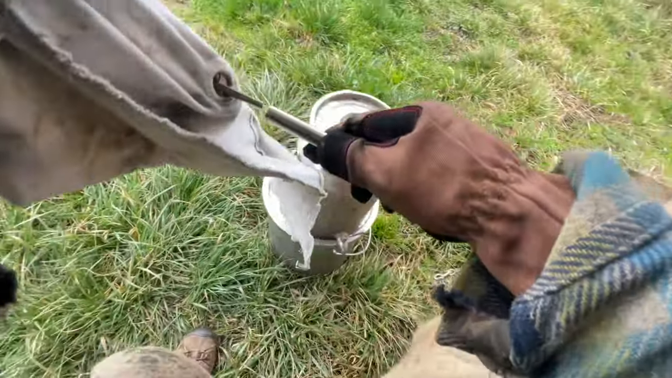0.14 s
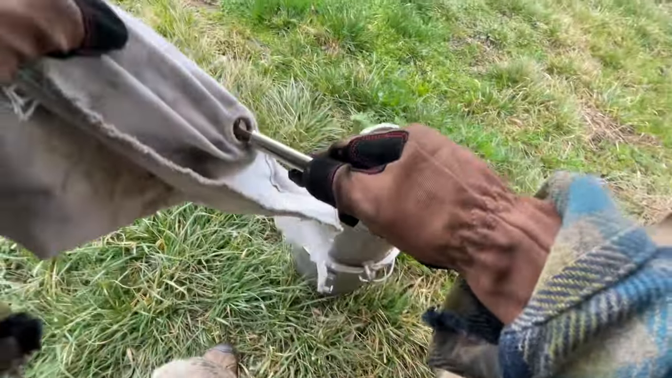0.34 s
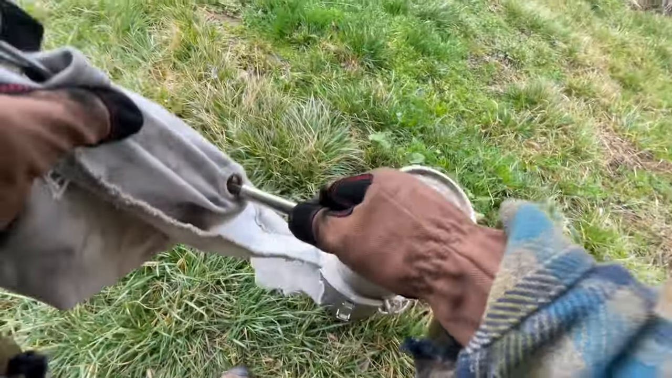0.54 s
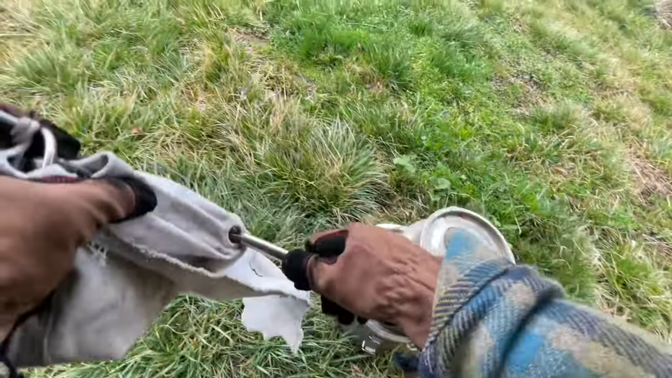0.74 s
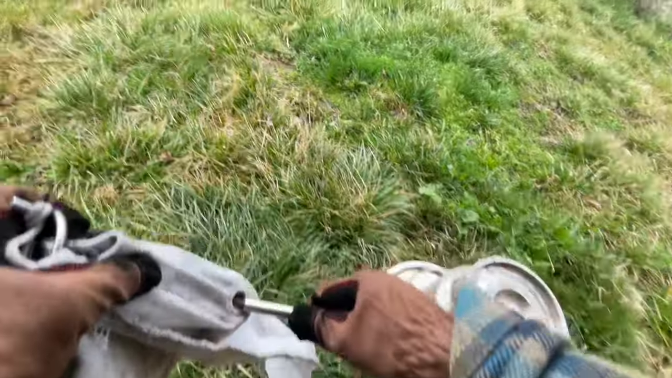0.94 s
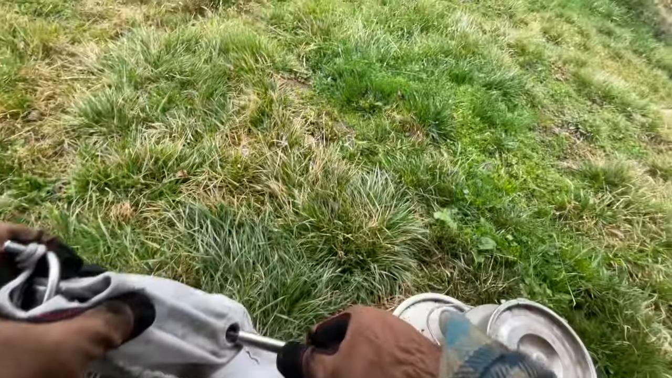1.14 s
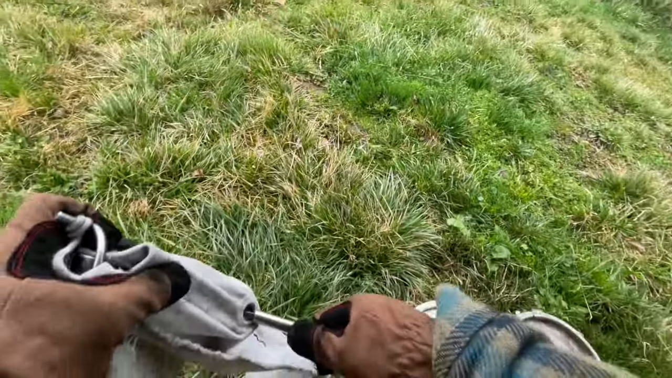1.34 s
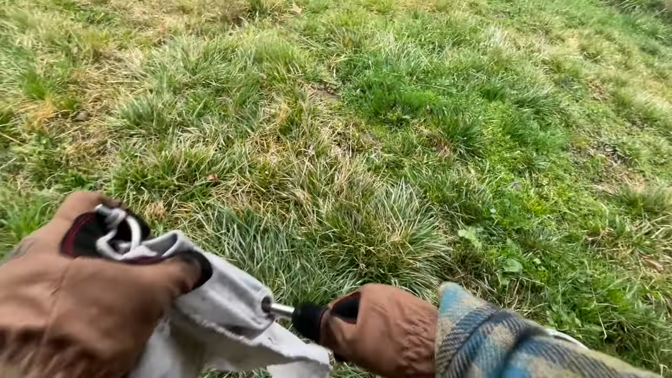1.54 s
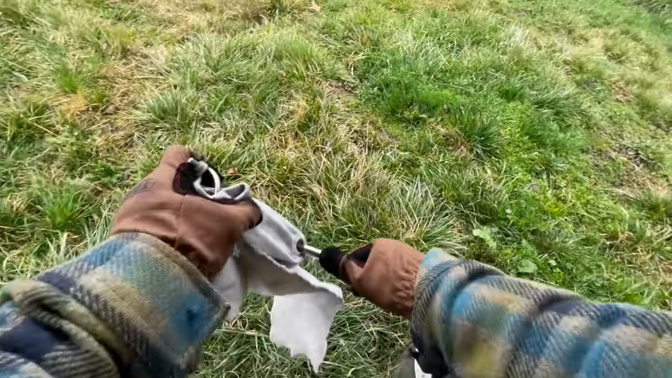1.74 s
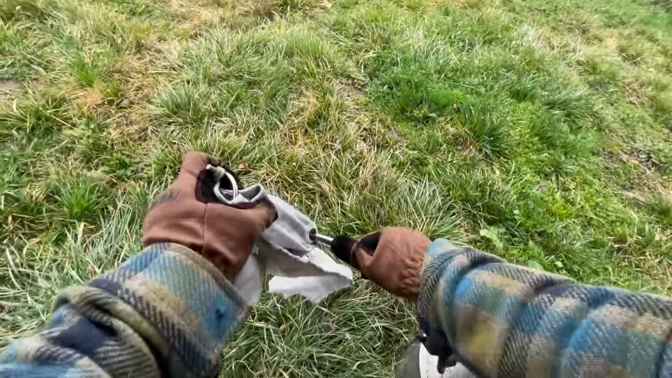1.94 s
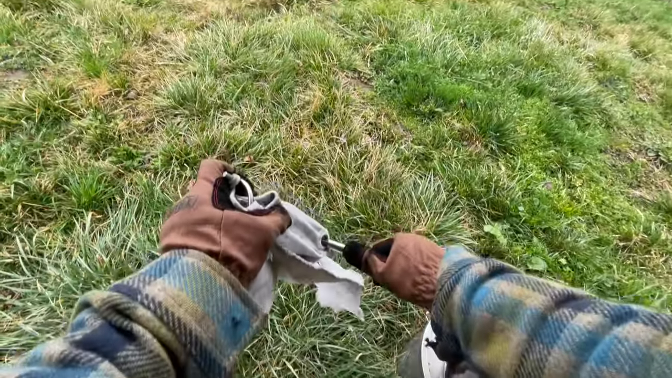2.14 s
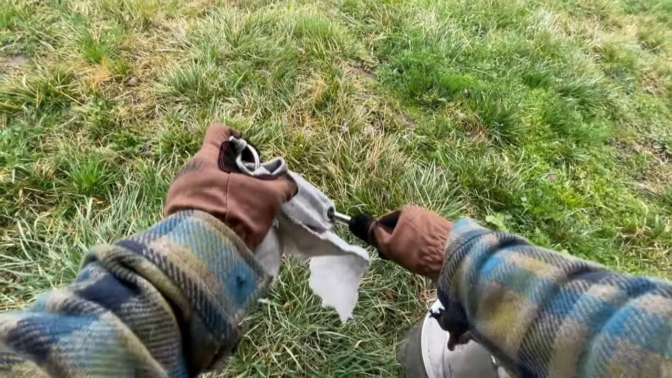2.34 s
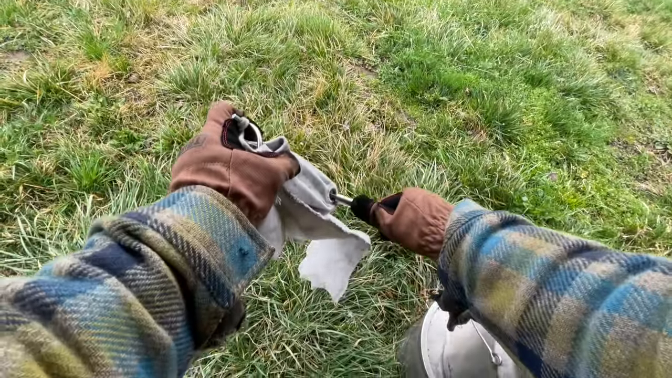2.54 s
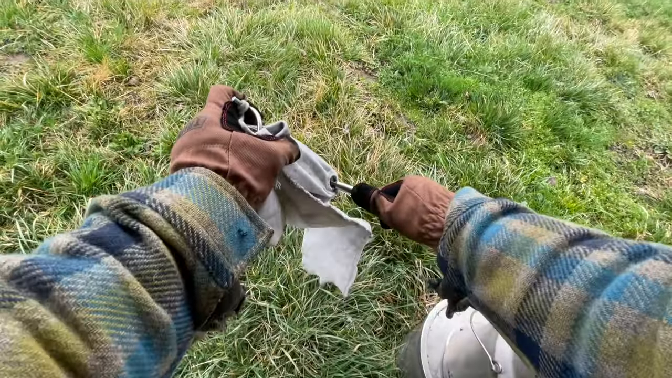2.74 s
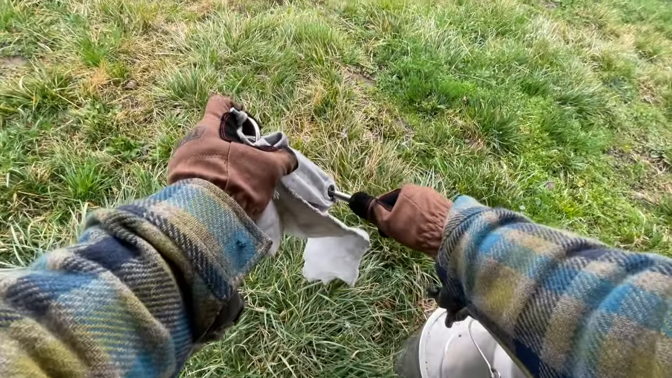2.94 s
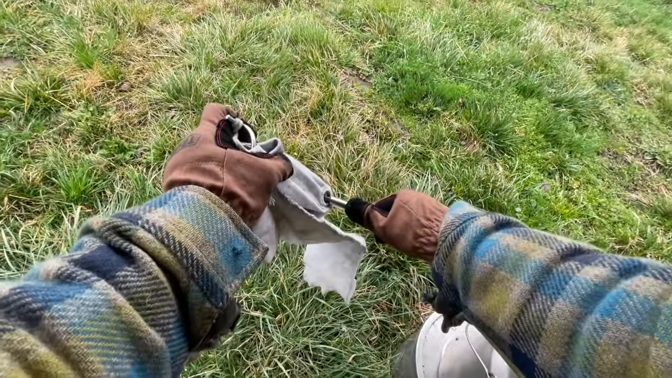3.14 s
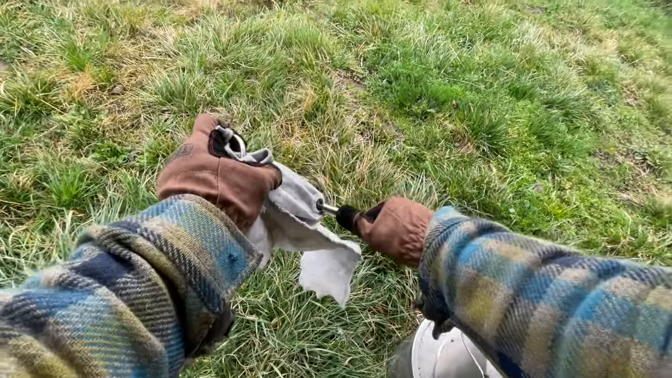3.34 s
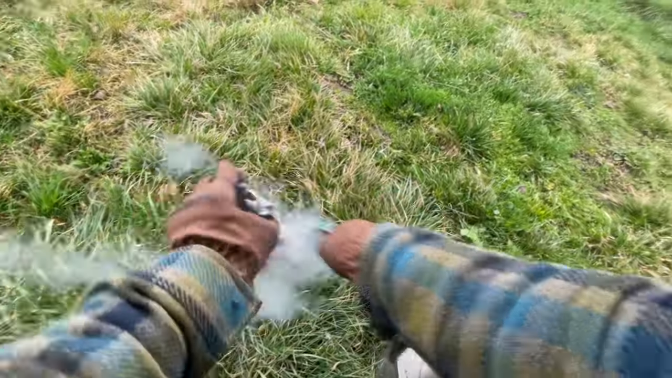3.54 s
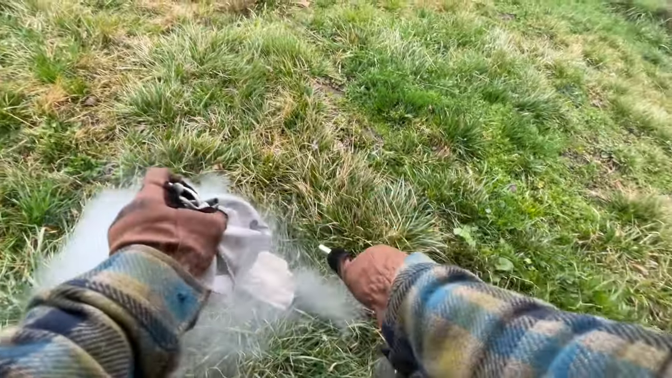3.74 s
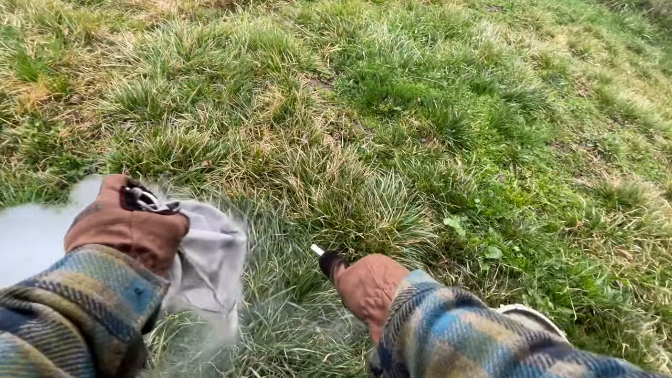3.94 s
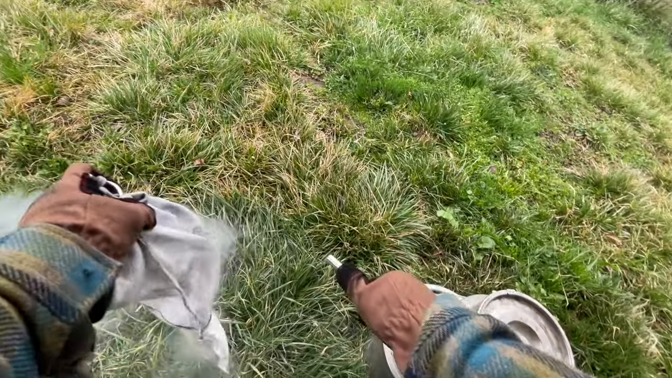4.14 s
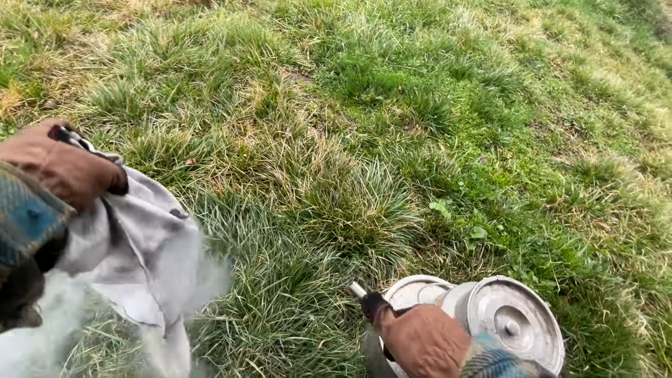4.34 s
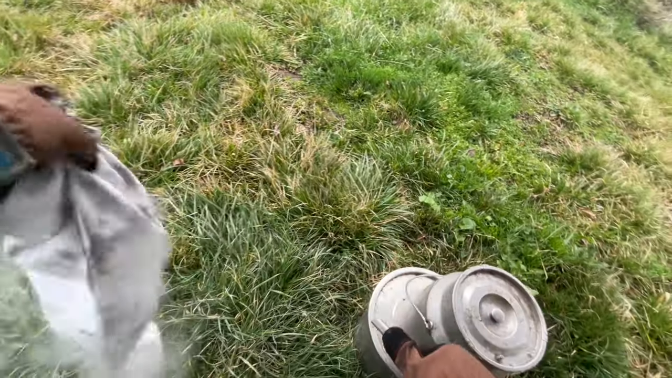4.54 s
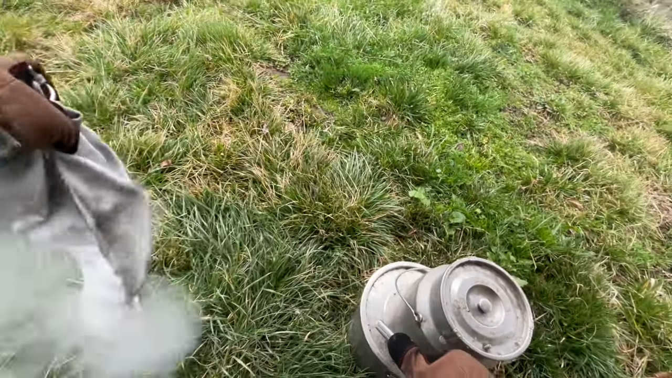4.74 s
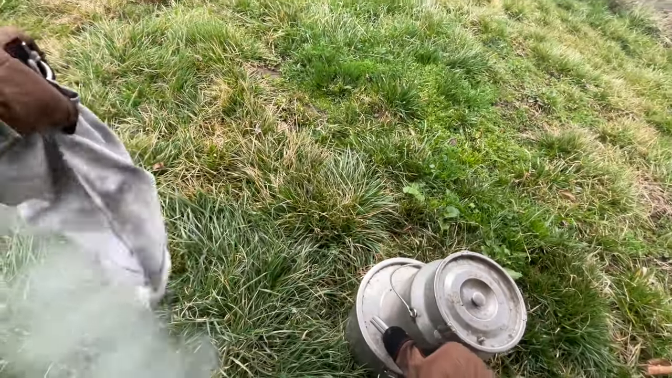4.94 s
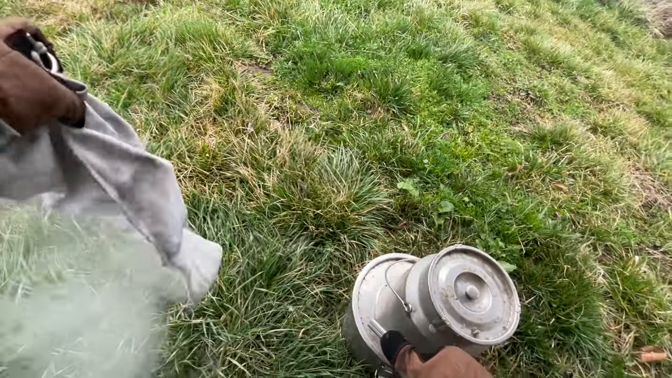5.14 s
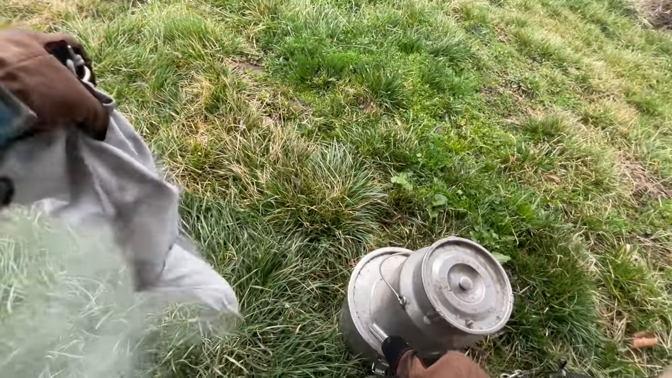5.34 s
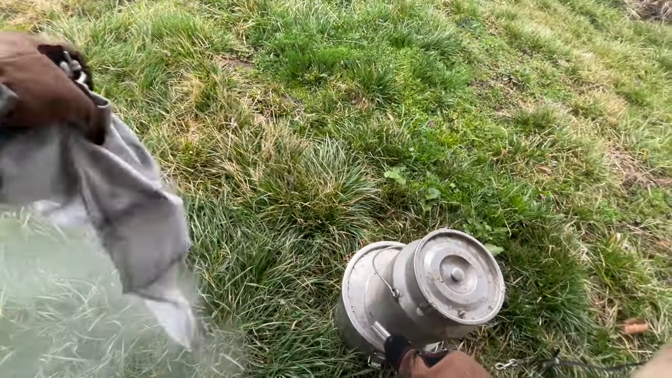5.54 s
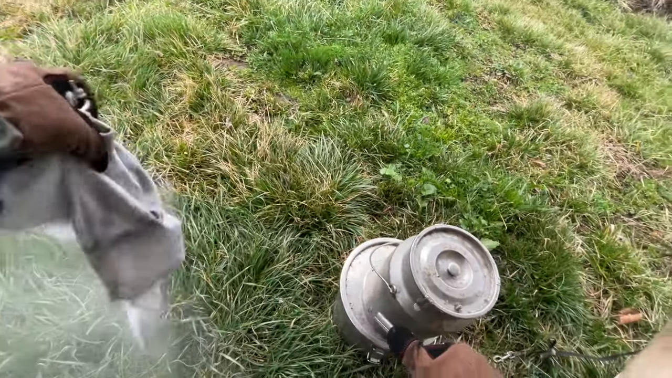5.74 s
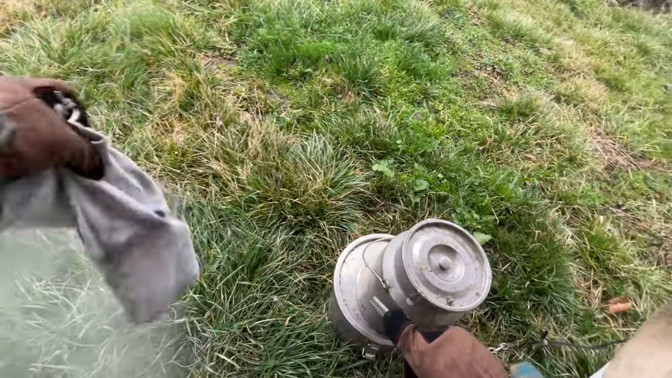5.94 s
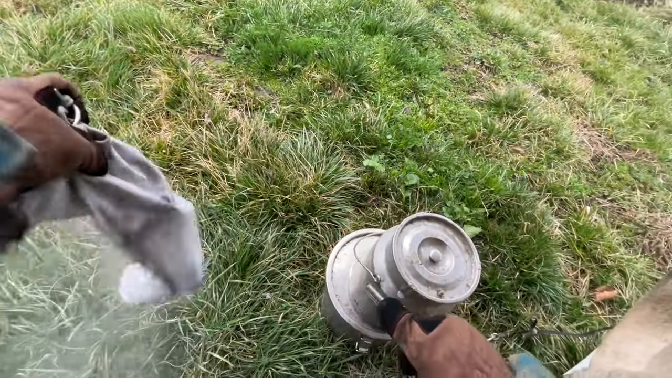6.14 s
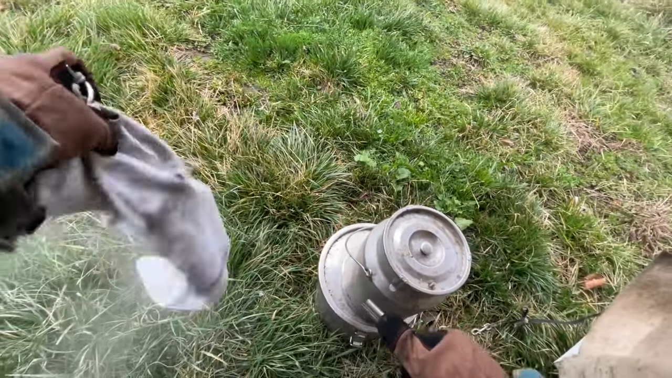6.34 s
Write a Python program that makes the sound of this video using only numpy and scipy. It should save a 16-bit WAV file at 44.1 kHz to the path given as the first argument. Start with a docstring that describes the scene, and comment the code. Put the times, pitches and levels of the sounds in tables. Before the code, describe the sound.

Gloved hands rub a sack, a small pressure vessel pops open with a violent steamy bang, then its loose iron lid clatters.

```python
"""Outdoors on grass, hands move a cloth sack and a small iron puffing vessel close to the microphone: filtered
noise rustles, rubs and snaps. Steam then shrieks through the lid gap, as fluttering tones and jet noise; the lid
flies off with a falling sine whoop, ground and hollow body answer, the latch ticks and a low hum sags in pitch.
Last the hot vessel is lowered, scraping, its loose lid and latch rattling as noise bursts and decaying modes.
A low rumble of open air lies under it all."""
import sys
import numpy as np
from scipy import signal
from scipy.fft import rfft, irfft, next_fast_len
from scipy.io import wavfile
from scipy.ndimage import uniform_filter1d

SR = 44100
rng = np.random.default_rng(int(sys.argv[2]) if len(sys.argv) > 2 else 0)


def store_pcm(level_fs):
    """Save levels as 16-bit WAV."""
    pcm = np.round(np.clip(level_fs, -1, 1) * 32767).astype(np.int16)
    wavfile.write(sys.argv[1], SR, np.atleast_2d(pcm).T)


N = 282350
TIME = np.arange(N) / SR

# Table levels are relative: each source adds its own trim and left-right balance.
# Spectra have the columns [f/Hz, spectral level/dB]; modal frequencies are nominal.

# tones of the steam in the lid gap [f/Hz, left level/dB, right level/dB]
GAP_TONES = [(410, -12, -7), (551, 3.5, -23), (1033, 0, -0.5), (1155, -19.5, -11.5), (1293, -33, -4.5),
             (1371, -27.5, -2), (1450, -37, -5.5), (1770, -39.5, -14.5), (1908, -33.5, -5.5),
             (2088, -28, -7), (2190, -30.5, -7.5), (2274, -34.5, -13.5), (2424, -38.5, -13),
             (3400, -21.5, -9.5), (3490, -27, -13), (4070, -55.5, -13), (4340, -36, -9.5), (4980, -11, -3),
             (5535, -13.5, -7.5), (5700, -10.5, -10), (5660, -13.5, -14.5), (6180, -10.5, -10.5),
             (6230, -12.5, -21), (6300, -12, -5.5), (6940, -14, -13), (7100, -12.5, -32)]
# turbulent rush of the jet [f/Hz, level/dB]
JET_SPECTRUM = [(40, -4.5), (150, 3.5), (400, -7), (680, -0.5), (900, -6.5), (1400, -11), (2300, -6.5),
                (3000, -12), (6000, -10.5), (8000, -19), (11000, -31.5), (16000, -35)]
# the bang as ground and field return it [f/Hz, level/dB]
RETURN_SPECTRUM = [(40, -10.5), (250, -9), (450, -1), (700, -5), (1000, -18), (1800, -18), (3400, -24),
                   (6000, -25.5), (10000, -35.5), (16000, -46.5)]
# swells of the low hum after the bang [start t/s, length t/s, level/dB]
THROB_SWELLS = [(3.54, 0.09, -45), (3.61, 0.2, -39), (3.8, 0.17, -43.5), (3.92, 0.16, -52),
                (4.06, 0.21, -59)]
# modes of the hollow vessel [f/Hz, level/dB, t60/s]
HOLLOW_MODES = [(336.4, -2, 0.083), (377, -8, 0.03), (459.3, -2.5, 0.055), (541.3, 0, 0.066),
                (619, -10, 0.019), (650, -15, 0.034)]
# modes of the lid and latch [f/Hz, level/dB, t60/s]
IRON_MODES = [(4410, -12, 0.03), (5940, -12, 0.029), (6380, -6, 0.041), (6810, 1.5, 0.047),
              (6900, 1.5, 0.066), (8600, -24, 0.29), (9500, -11, 0.039), (10100, -6, 0.043),
              (10390, -3, 0.048), (11550, -4, .04), (11600, -18, .04), (11700, 1, 0.054), (13300, -7, .04),
              (14570, -21, .06), (15480, -16, .05)]
# jolts of the vessel and its loose lid [t/s, lid ring level/dB, clack level/dB, body thud level/dB]
JOLTS = [(0.064, -63, -46, -32.5), (3.659, -52.5, -48, -58), (3.6925, -53.5, -72, -70),
         (3.8898, -56, -70, -65), (4.044, -79, -56, -48), (4.4119, -58, -73, -62), (4.45, -72, -64, -45),
         (4.501, -49.5, -61, -46), (4.526, -49, -58, -37.5), (4.5782, -48, -34.5, -38),
         (4.604, -42.5, -69, -39), (4.652, -63, -50, -41.5), (4.7667, -45, -52, -44),
         (4.788, -44.5, -50, -41.5), (4.8927, -50, -55, -55), (4.9059, -54.5, -45.5, -61),
         (5.002, -54.5, -49, -40), (5.066, -59, -49, -30.5), (5.079, -60, -47, -40.5),
         (5.133, -46, -60, -54), (5.159, -43.5, -59, -36.5), (5.23, -50.5, -48.5, -38),
         (5.276, -44.5, -30.5, -33.5), (5.3186, -50, -54, -52), (5.414, -52, -50, -42),
         (5.45, -41.5, -32.5, -37), (5.476, -42, -49, -33), (5.549, -42, -40, -40),
         (5.6283, -41, -41.5, -35.5), (5.6458, -40, -33.5, -37), (5.715, -50, -49.5, -50),
         (5.8386, -49.5, -43.5, -40.5), (5.934, -46, -36.5, -47), (6.0005, -41.5, -42, -35.5),
         (6.0353, -43, -49, -43), (6.0785, -39, -44, -43), (6.141, -62, -59, -38.5),
         (6.1799, -41.5, -63, -55), (6.2052, -43.5, -39, -39.5), (6.3017, -44.5, -51, -39.5),
         (6.321, -42.5, -41, -36), (6.3383, -31.5, -23.5, -27.5), (6.3697, -38.5, -60, -50)]
# light ticks of iron on iron [f/Hz, level/dB]
TICK_SPECTRUM = [(800, -30.5), (3000, -2.5), (5000, -10), (6600, 0.5), (8500, -12.5), (10200, -2),
                 (12000, -11), (13600, -10), (14300, -22), (16000, -22)]
# short clack of iron on iron [f/Hz, level/dB]
CLACK_SPECTRUM = [(500, -24), (1900, -10.5), (2600, -1.5), (3400, 1), (4200, -9), (5500, -15), (9000, -27)]
# bump of the vessel: its body, its bass and its knock [f/Hz, level/dB]
BUMP_SPECTRUM = [(60, -18), (200, -7), (340, -1), (430, -7.5), (530, 1.5), (680, -12.5), (1000, -6.5),
                 (2500, -44.5)]
BUMP_BASS_SPECTRUM = [(25, -32), (70, -5), (150, 5), (260, -11), (600, -56)]
BUMP_KNOCK_SPECTRUM = [(400, -16), (880, -12), (1300, 28), (1750, 3), (2300, 13), (4000, -26)]
# short gritty swells: scrapes of iron and the bodies of hard knocks
# [start t/s, length t/s, level/dB, centre f/Hz]
GRITTY_SWELLS = [(0.06, 0.019, -44, 1110), (3.828, 0.061, -66, 3000), (4.041, 0.023, -52.5, 1490),
                 (5.061, 0.056, -51.5, 1390), (5.269, 0.12, -54.5, 2110), (5.96, 0.056, -53, 2260),
                 (6.333, 0.028, -37, 920)]
# phase by which the left port leads for sounds of the vessel [f/Hz, phase/rad]
PORT_LEAD = [(100, 0.1), (350, 1.1), (550, 1.83), (900, 2.8), (1400, 3.1), (2300, 4.68), (3400, 5.5),
             (6900, 8.13), (10250, 13), (16000, 17.7)]
# right port against left for sounds of the vessel [f/Hz, level/dB]
PORT_BALANCE = [(100, -2), (350, -2), (550, 1.5), (900, -10), (1400, -3.5), (2300, -2), (3400, -4),
                (6900, -9), (10250, -1.5), (16000, 0)]
# briskness of the hands on sack and vessel [t/s, level/dB]
MOVEMENT = [(0, 2.5), (0.25, 0), (0.7, -2.5), (1.05, -12.5), (1.9, -8.5), (2.3, -22.5), (3.2, -26.5),
            (3.5, -2.5), (3.72, -13), (3.95, -8), (4.33, -20), (4.6, -4), (4.9, -8), (5.15, -0.5),
            (5.45, 3.5), (5.8, -0.5), (6.15, -3), (6.4, -1.5)]
# hiss of cloth, dull rubbing and gritty scraping [f/Hz, level/dB]
CLOTH_SPECTRUM = [(500, -23.5), (1500, 0.5), (3200, -0.5), (4800, -0.5), (6600, 1), (8300, -8.5),
                  (10300, -5), (13000, -15.5), (14200, -24.5), (16000, -23.5)]
RUB_SPECTRUM = [(20, -30), (45, -5.5), (80, -1), (170, -0.5), (340, 1.5), (530, -2), (750, -12),
                (1200, -22.5), (3000, -46)]
SCRAPE_SPECTRUM = [(300, -17.5), (800, 5), (1080, -3.5), (1330, 2), (1700, -5.5), (2300, -5), (2900, -11),
                   (4000, -26), (9000, -37)]
# folds of the sack sliding over each other [start t/s, length t/s, hiss level/dB]
FOLDS = [(0.1, 0.37, -60.5), (0.55, 0.11, -67.5), (0.92, 0.13, -67.5), (1.08, 0.076, -72.5),
         (1.2, 0.15, -67), (1.6, 0.37, -73), (3.45, 0.21, -68.5), (5.19, 0.16, -61.5), (5.94, 0.18, -62),
         (6.2, 0.21, -57.5)]
# strokes of a sleeve [start t/s, length t/s, dull body level/dB, swish level/dB]
SLEEVE_STROKES = [(0.102, 0.11, -52, -56), (0.175, 0.09, -46.5, -58), (0.252, 0.097, -48.5, -49),
                  (0.351, 0.094, -56.5, -60.5)]
# the two colours of a sleeve stroke [f/Hz, level/dB]
SLEEVE_BODY_SPECTRUM = [(120, -22), (230, -4.5), (350, -0.5), (440, -2), (520, -21), (900, -37.5)]
SLEEVE_SWISH_SPECTRUM = [(1200, -23), (2200, -14), (2600, 0.5), (2950, -6), (3300, -1), (3800, -11),
                         (4400, -5), (5200, -16), (6500, -3.5), (7300, -18), (12000, -30)]
# snaps of cloth and creaks of the lever [t/s, peak level/dB, centre f/Hz]
SNAPS = [(0.063, -47, 2200), (0.2613, -44, 1780), (0.4235, -52.5, 1740), (0.7473, -53, 5200),
         (1.3179, -54, 2540), (1.3294, -50.5, 2510), (1.3685, -52.5, 2860), (1.3962, -55, 2700),
         (1.4046, -51.5, 2560), (1.4454, -52.5, 2550), (1.523, -53, 2480), (1.5317, -54, 2840),
         (2.332, -61, 4180), (2.582, -62, 4230), (3.3138, -54.5, 2300), (3.6012, -52.5, 4130),
         (3.6594, -44.5, 9500), (4.0435, -47, 2000)]
# low buffets as the body shifts [start t/s, length t/s, level/dB]
BUFFETS = [(0.06, 0.066, -47), (0.26, 0.056, -44.5), (0.415, 0.05, -41), (4.035, 0.038, -48),
           (5.33, 0.16, -44), (5.47, 0.11, -42.5), (5.6, 0.059, -49)]
# colour of the buffets [f/Hz, level/dB]
BUFFET_SPECTRUM = [(20, -11), (45, 1), (90, -1), (150, -5.5), (220, -5), (320, -20), (600, -53)]
# colour of the open air [f/Hz, level/dB]
AIR_SPECTRUM = [(15, -48.5), (25, -19.5), (39, -10.5), (64, -2), (243, -19), (286, -24), (335, -16),
                (394, -29), (655, -13), (1580, -31), (2180, -52), (7090, -51), (15000, -68)]
# left-right correlation of the open air, of close sounds and of the cracking seal [f/Hz, correlation]
AIR_LIKENESS = [(60, .8), (130, 0.81), (290, 0.12), (700, -.4), (1400, -0.32), (3000, 0.16), (15000, 0.15)]
NEAR_LIKENESS = [(60, 0.29), (300, .5), (700, -0.26), (1400, -0.15), (3000, -0.26), (6800, -0.39),
                 (15000, 0.16)]
CRACK_LIKENESS = [(1000, 0), (8000, 0.41), (11000, -.6), (16000, -.6)]

CRACK_S, OPEN_S = 3.4985, 3.5188  # the seal cracks; the lid is thrown clear
LATCH_END_S = 3.7  # end of the latch ticks that follow the crack
LOWER_S = 4.4  # the vessel starts to be lowered
THROB_START_HZ, THROB_END_HZ, THROB_SAG_S = 53.5, 45, 0.14  # the pitch sags from the moment of opening
RUB_FOLLOWS, CLOTH_FOLLOWS = 0.6, 0.63  # dB of rubbing and of cloth sound per dB of movement
CHATTER_S = 0.012  # Gaussian decay time of the lid's chatter
TOP_FULL_DB, TOP_FOLLOWS = -28.85, 0.63  # ring level giving the top modes their table level; dB per dB from it
HARD_DB, PING_FOLLOWS = -19, 0.4  # clack level of a full latch ping; dB of ping lost per dB below it
CUT_HZ = 16200


def amp(db):
    """Level in decibels to amplitude ratio."""
    return 10 ** (np.asarray(db) / 20)


def unit(x):
    """Normalisation to an rms of one."""
    return x / np.sqrt(np.mean(x ** 2) + 1e-20)


def unit_peak(x):
    """Normalisation so that the loudest 3 ms have an rms of one."""
    power = uniform_filter1d(np.mean(x ** 2, 0), size=132)
    return x / np.sqrt(power.max() + 1e-20)


def read(points, hz):
    """Interpolation of a spectrum along a log-frequency axis."""
    f, value = np.transpose(points)
    return np.interp(np.log(hz + 1), np.log(f + 1), value)


def pan(db):
    """Left and right gains for a level difference; positive favours the left."""
    return amp(np.array([[db], [-db]]) / 2)


def add(mix, s, sound):
    """Superposition of a sound on the mix from time s."""
    part = mix[:, max(round(s * SR), 0):][:, :sound.shape[1]]
    part += sound[:, :part.shape[1]]


def seconds(length):
    """A time axis in seconds."""
    return np.arange(round(length * SR)) / SR


def noise(colour, n, likeness=NEAR_LIKENESS):
    """Filtered noise: a given spectrum, and a given correlation between the sides at each frequency."""
    size = next_fast_len(n)
    hz = np.fft.rfftfreq(size, 1 / SR)
    a, b = rfft(rng.standard_normal((2, size)))
    same = np.clip(read(likeness, hz), -1, 1)
    sides = np.array([a, same * a + np.sqrt(1 - same ** 2) * b])
    return unit(irfft(sides * amp(read(colour, hz)), size)[:, :n])


def wander(per_s, n=N):
    """Slow random modulation: joined random points, per_s of them each second, with an rms of one."""
    at = np.arange(n) * per_s / SR
    return unit(np.interp(at, np.arange(n), rng.standard_normal(n)))


def arch(start, length):
    """Half-sine envelope: a gain that swells from zero to one and back."""
    out = np.zeros((1, N))
    add(out, start, np.sin(np.pi * seconds(length) / length)[None])
    return out[0]


def swells(rows):
    """Sum of half-sine envelopes, each with its start, length and level."""
    return sum(amp(db) * arch(start, length) for start, length, db in rows)


def burst(colour, rise, t60, tail_db, tail_t60):
    """Impact with two decay rates: coloured noise dies fast over a weaker, longer tail."""
    t = seconds(.2)
    decay = amp(-60 * t / t60) + amp(tail_db - 60 * t / tail_t60)
    shape = (1 - np.exp(-t / rise)) * decay
    return unit_peak(noise(colour, len(t)) * shape)


def ringing(modes, t, tilt_db=0, scatter_db=4, detune=0.0078):
    """Modal decay of a struck body; each blow weights and loads the modes a little differently."""
    hz, db, t60 = np.transpose(modes)[:, :, None]
    hz = hz * (1 + detune * rng.standard_normal(hz.shape))
    strengths = amp(db + tilt_db + scatter_db * rng.standard_normal(hz.shape) - 60 * t / t60)
    turns = hz * t + rng.random((len(hz), 1))
    return (strengths * np.sin(2 * np.pi * turns)).sum(0)


def movement():
    """Briskness of the hands at every moment, in dB."""
    return np.interp(TIME, *np.transpose(MOVEMENT))


def steam_jet(tones_db=-11.5, rush_db=-14, crack_db=-17, swell_s=.0098, flutter_rad=0.59,
              shut_s=0.00056, port_delay_s=.00034):
    """Jet noise: steam shrieks in the widening gap, grows turbulent, and stops dead as the lid clears it."""
    t = seconds(.04)
    late = np.maximum(t - (OPEN_S - CRACK_S), 0)
    flow = np.minimum(t / swell_s, 1) ** 2 * np.exp(-late / shut_s)
    arrival = np.array([t, t - port_delay_s])  # the tones reach the left port first
    tones = 0
    for hz, left_db, right_db in GAP_TONES:
        phase = 2 * np.pi * (hz * arrival + rng.random()) + flutter_rad * wander(250, len(t))
        tones = tones + amp([[left_db], [right_db]]) * np.sin(phase)
    gap = np.minimum(t / (OPEN_S - CRACK_S), 1)
    rush = amp(rush_db) * gap * noise(JET_SPECTRUM, len(t)) * pan(-3.5)
    crack = amp(crack_db) * gap ** 6 * noise(TICK_SPECTRUM, len(t), CRACK_LIKENESS)
    return flow * (amp(tones_db) * unit(tones) + rush + crack)


def blast(blast_db=-5.0, start_hz=580, left_glide_s=.0041, right_glide_s=.00427, lead_s=.002,
          left_hold_s=.011, right_hold_s=.008, push_db=-28, push_s=.027):
    """Sudden discharge: a whoop grows out of the jet and dives in pitch to nothing; a slow push of air follows."""
    t = seconds(.15) - lead_s  # zero at the opening, where the pitch passes start_hz
    glide_s = np.array([[left_glide_s], [right_glide_s]])
    turns = start_hz * glide_s * (1 - np.exp(-t / glide_s))
    hold = np.array([[left_hold_s], [right_hold_s]])
    shape = np.clip(1 + t / lead_s, 0, 1) / np.sqrt(1 + (t / hold) ** 6)
    whoop = amp(blast_db) * shape * np.sin(2 * np.pi * turns) * pan(1.0)
    u = np.maximum(t, 0) / push_s
    push = amp(push_db) * u ** 2 * np.exp(1 - u ** 2) * pan(11)
    return OPEN_S - lead_s, whoop + push


def field_return(return_db=-21, hollow_db=-27):
    """Scattering and resonance: grass and ground return the bang briefly, and the emptied vessel rings hollow."""
    hollow = unit_peak(ringing(HOLLOW_MODES, seconds(.2), scatter_db=1) * pan(-3))
    scattered = burst(RETURN_SPECTRUM, rise=0.0011, t60=.07, tail_db=-38, tail_t60=0.25)
    return amp(return_db) * scattered + amp(hollow_db) * hollow


def throb(second_db=-30, third_db=-27):
    """Harmonic tone with falling fundamental: a deep hum swells a few times after the bang."""
    sag = np.exp(-np.maximum(TIME - OPEN_S, 0) / THROB_SAG_S)
    hz = THROB_END_HZ + (THROB_START_HZ - THROB_END_HZ) * sag
    turn = 2 * np.pi * np.cumsum(hz) / SR
    wave = np.sin(turn) + amp(second_db) * np.sin(2 * turn) + amp(third_db) * np.sin(3 * turn)
    return swells(THROB_SWELLS) * np.sqrt(2) * wave * pan(7)


def latch_ticks(count=14, early_db=-53, late_db=-64, spread_db=2):
    """Stick-slip: from the crack of the seal the latch slips in tiny ticks, ever sparser and fainter."""
    out = np.zeros((2, N))
    colour = [(500, -8), (2500, -1), (5800, 0), (8000, -12), (12000, -14), (16000, -30)]
    # nearness to the crack: one at CRACK_S, zero at LATCH_END_S
    for nearness in np.sqrt((np.arange(count) + rng.random(count)) / count):
        db = late_db + (early_db - late_db) * nearness + spread_db * rng.standard_normal()
        tick = burst(colour, rise=0.0004, t60=0.007, tail_db=-24, tail_t60=0.05)
        add(out, LATCH_END_S + nearness * (CRACK_S - LATCH_END_S), amp(db) * tick)
    return out


def rattle(db, hard_db, ring_db=-5.0, tick_db=-7, clack_db=-2, grit_db=-5, contacts_per_s=1500,
           swell_s=0.00041):
    """Repeated impact: iron clacks on iron, then chatters in tiny contacts; harder jolts ring brighter."""
    t = seconds(.2)
    top_modes = np.array(IRON_MODES)[:, :1] > 9000  # Hz
    shape = (1 - np.exp(-t / swell_s)) * np.exp(-(t / CHATTER_S) ** 2)
    struck = rng.random(len(t)) < contacts_per_s / SR
    contacts = shape * rng.standard_normal((2, len(t))) * struck
    ring = ringing(IRON_MODES, t, top_modes * TOP_FOLLOWS * (db - TOP_FULL_DB))
    chatter = unit_peak(signal.fftconvolve(contacts, ring[None], axes=1)[:, :len(t)])
    grit = unit_peak(shape * noise(TICK_SPECTRUM, len(t)))
    tick = burst(TICK_SPECTRUM, rise=0.00028, t60=0.0045, tail_db=-22, tail_t60=0.15)
    clack = burst(CLACK_SPECTRUM, rise=0.00042, t60=0.0056, tail_db=-21, tail_t60=0.093)
    bright = amp(ring_db) * chatter + amp(grit_db) * grit + amp(tick_db) * tick
    return amp(db) * bright * pan(2.2) + amp(hard_db + clack_db) * clack * pan(2.0)


def bump(db, hard_db, body_db=-6.5, hollow_db=-8, bass_db=-22, knock_db=-13, hard_share=0.5):
    """Impact of a heavy body on its support and the gloved hand; the harder the contact, the more it knocks."""
    t = seconds(.2)
    hollow = unit_peak(ringing(HOLLOW_MODES, t) * (1 - np.exp(-t / 0.0034)) * pan(-1.5))
    body = burst(BUMP_SPECTRUM, rise=0.0025, t60=0.051, tail_db=-15, tail_t60=0.13)
    bass = burst(BUMP_BASS_SPECTRUM, rise=0.004, t60=0.1, tail_db=-28, tail_t60=.15)
    knock = burst(BUMP_KNOCK_SPECTRUM, rise=0.0019, t60=0.092, tail_db=-2, tail_t60=0.15)
    knock_gain = amp(knock_db + hard_share * (hard_db - db))
    return amp(db) * (amp(hollow_db) * hollow + amp(body_db) * body + amp(bass_db) * bass + knock_gain * knock)


def ping(db, ping_db=-2, ping_hz=3300, scatter=0.05, peak_s=0.00055, onset_s=0.00038):
    """Heavily damped resonance: the latch strikes its stop for a few cycles, strongest in hard jolts."""
    t = np.maximum(seconds(.2) - onset_s, 0)
    hz = ping_hz * (1 + scatter * rng.standard_normal())
    cycles = unit_peak(t * np.exp(-t / peak_s) * np.sin(2 * np.pi * hz * t) * pan(2))
    return amp(db + ping_db + PING_FOLLOWS * (db - HARD_DB)) * cycles


def jolts(count=26, faint_ring_db=-58, faint_clack_db=-55, faint_thud_db=-47, spread_db=3.0):
    """Impact series: each jolt rattles lid and body; faint ones keep coming while the vessel is lowered."""
    out = np.zeros((2, N))
    times = LOWER_S + (np.arange(count) + rng.random(count)) / count * (N / SR - LOWER_S)
    faint_db = np.array([faint_ring_db, faint_clack_db, faint_thud_db])
    levels = faint_db + spread_db * rng.standard_normal((count, 3))
    for s, ring_db, clack_db, thud_db in [*np.column_stack([times, levels]), *JOLTS]:
        add(out, s, ping(clack_db) + rattle(ring_db, clack_db) + bump(thud_db, clack_db))
    return out


def gritty_swells(skirt_db=-14, grain_db=3):
    """Narrow-band noise in half-sine swells, loosely pitched: scrapes of iron and the bodies of hard knocks."""
    out = np.zeros((2, N))
    for s, length, db, hz in GRITTY_SWELLS:
        t = seconds(length)
        colour = [(hz / 8, -35), (hz / 1.3, skirt_db), (hz, 0), (hz * 1.2, skirt_db), (hz * 8, -45)]
        grains = unit(noise(colour, len(t)) * amp(grain_db * wander(398, len(t))))
        add(out, s, amp(db) * np.sin(np.pi * t / length) * grains * pan(2.7))
    return out


def dragging(drag_db=-62.5, slip_db=4):
    """Friction-driven resonance: rubbing keeps the hollow body sounding while the vessel is lowered."""
    lowered = np.clip((TIME - LOWER_S) / 0.051, 0, 1)
    body = ringing(HOLLOW_MODES, seconds(.2), scatter_db=0, detune=0)
    friction = rng.standard_normal(N) * amp(slip_db * wander(50))
    hollow = signal.fftconvolve(friction, body)[:N]
    return lowered * amp(drag_db + RUB_FOLLOWS * movement()) * unit(hollow) * pan(-1)


def at_ports(x, direct=0.79):
    """Interaural coherence: most of the right port's sound is the left's, lagging in phase and rebalanced."""
    left, right = rfft(x)
    hz = np.fft.rfftfreq(N, 1 / SR)
    later = left * amp(read(PORT_BALANCE, hz)) * np.exp(-1j * read(PORT_LEAD, hz))
    return irfft(np.array([left, direct * later + np.sqrt(1 - direct ** 2) * right]), N)


def handling(cloth_db=-68, fold_db=1, rub_db=-57.0, scrape_db=-59.5,
             cloth_grain_db=2.0, rub_grain_db=3.5, scrape_grain_db=3.0):
    """Friction noise: sack, sleeves and iron slide in uneven little slips, louder as the hands move faster."""
    brisk, slips = movement(), wander(45)
    cloth = np.hypot(amp(cloth_db + CLOTH_FOLLOWS * brisk), amp(fold_db) * swells(FOLDS))
    hiss = noise(CLOTH_SPECTRUM, N) * cloth * amp(1.7 * slips + cloth_grain_db * wander(700))
    dull = noise(RUB_SPECTRUM, N) * amp(rub_db + RUB_FOLLOWS * brisk + rub_grain_db * slips)
    gritty_db = scrape_db + brisk + slips + scrape_grain_db * wander(250)
    gritty = noise(SCRAPE_SPECTRUM, N) * amp(gritty_db)
    return hiss * pan(8.7) + dull * pan(-.5) + gritty * pan(2.5)


def crumbs(crumb_db=-71, per_s=160, spread_db=4.5):
    """Random micro-impacts: grit and fibres catch and let go under the sliding cloth and iron."""
    strengths = amp(spread_db * np.minimum(rng.exponential(1, (2, N)), 4))
    sizes = strengths * (rng.random(N) < per_s / SR)
    slips = signal.lfilter([1], [1, -np.exp(-1 / (0.00047 * SR))], sizes)  # each decays over 0.47 ms
    colour = [(500, -14), (1300, -1), (3200, -0.5), (5000, -6), (6800, -4), (12000, -14), (16000, -30)]
    return amp(crumb_db + CLOTH_FOLLOWS * movement()) * unit(slips * noise(colour, N)) * pan(2)


def sleeve(body_db=1.0, swish_db=-1):
    """Friction noise in two bands: thick wool brushes along the sack in a few short strokes."""
    body = swells((s, length, db) for s, length, db, _ in SLEEVE_STROKES)
    swish = swells((s, length, db) for s, length, _, db in SLEEVE_STROKES)
    dull = amp(body_db) * body * noise(SLEEVE_BODY_SPECTRUM, N) * pan(-2)
    return dull + amp(swish_db) * swish * noise(SLEEVE_SWISH_SPECTRUM, N) * pan(4.2)


def snaps(snap_db=1.5, skirt_db=-20):
    """Sudden release: small dry snaps and creaks, each a noise burst around its own pitch."""
    out = np.zeros((2, N))
    for s, db, hz in SNAPS:
        colour = [(hz / 10, -30), (hz / 2, skirt_db), (hz, 0), (hz * 2, skirt_db), (hz * 10, -35)]
        snap = burst(colour, rise=0.00044, t60=0.0049, tail_db=-20.5, tail_t60=0.066)
        add(out, s, amp(db + snap_db) * snap * pan(1.0))
    return out


def buffets(buffet_db=-2):
    """Low-frequency noise in half-sine swells: soft rumbles close to the microphone."""
    return amp(buffet_db) * swells(BUFFETS) * noise(BUFFET_SPECTRUM, N) * pan(2.2)


def open_air(air_db=-56, dip_db=-5):
    """Stationary low-pass background: a faint far rumble, its level dipping for a while around and after the bang."""
    dip = np.interp(TIME, [3.5, 3.6, 4.4, 5.0], [0, 1, 1, 0])
    rumble = noise(AIR_SPECTRUM, N, AIR_LIKENESS) * pan(-3)
    return rumble * amp(air_db + dip_db * dip + wander(4))


def scene():
    """Superposition of all the sources at the microphone."""
    vessel = at_ports(jolts() + gritty_swells() + dragging()) + latch_ticks() + throb()
    hands = handling() + crumbs() + sleeve() + buffets() + snaps()
    out = open_air() + hands + vessel
    add(out, CRACK_S, steam_jet())
    add(out, *blast())
    add(out, OPEN_S, field_return())
    return out


def record(dry, shelf_db=-7):
    """Limiting and band limit: clipping at full scale, a treble shelf down above about 13.3 kHz, a low-pass."""
    colour = amp(read([(13300, 0), (14300, shelf_db)], np.fft.rfftfreq(N, 1 / SR)))
    heard = irfft(rfft(np.clip(dry, -1, 1)) * colour, N)
    low_pass = signal.firwin(511, CUT_HZ, window=("kaiser", 9), fs=SR)
    return signal.oaconvolve(heard, low_pass[None], "same")


dry = scene()
out = record(dry)
store_pcm(out)
```